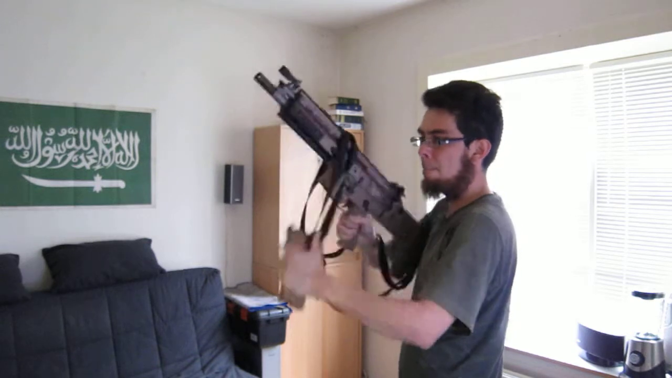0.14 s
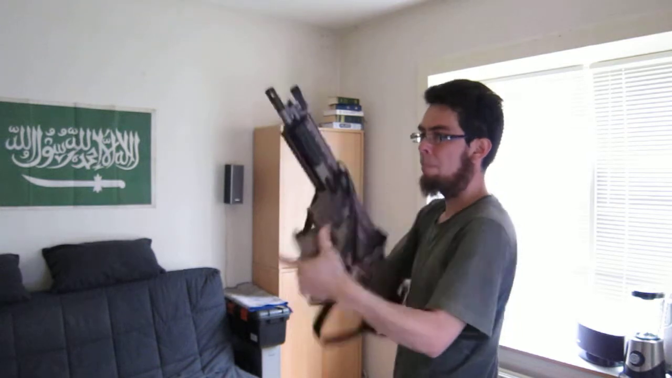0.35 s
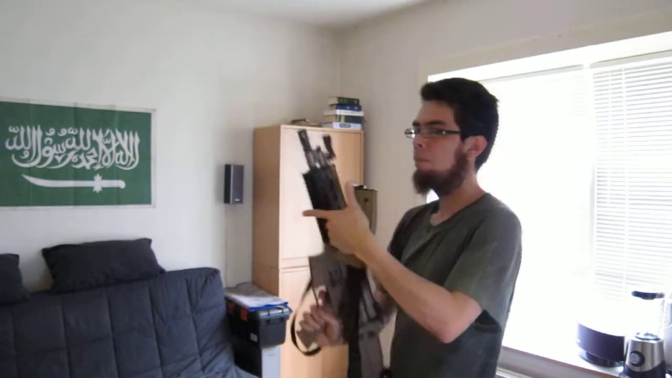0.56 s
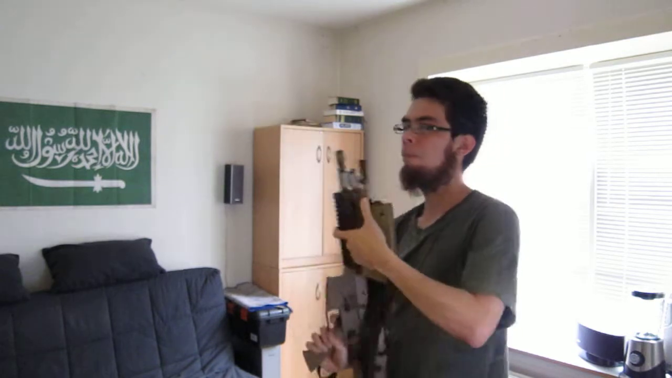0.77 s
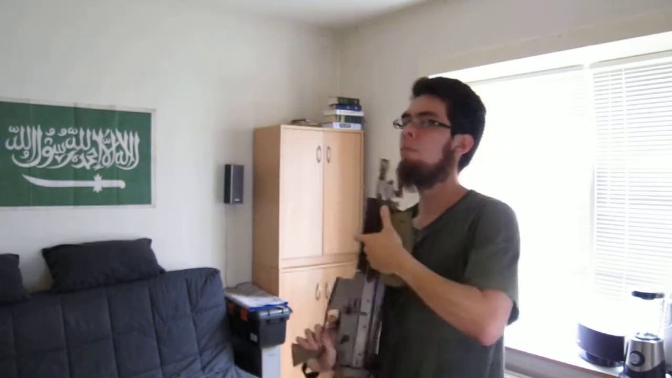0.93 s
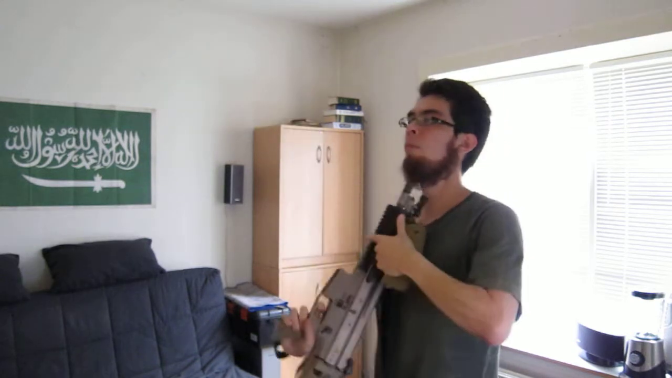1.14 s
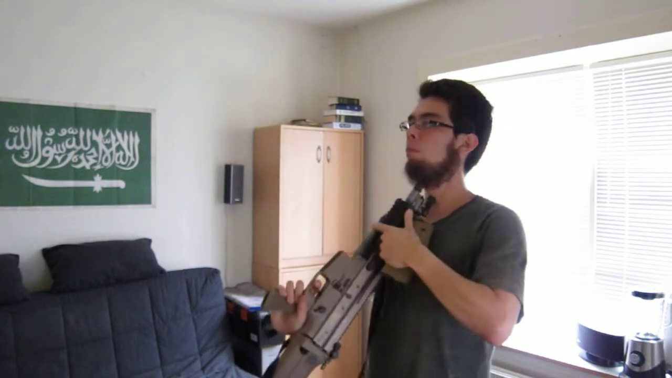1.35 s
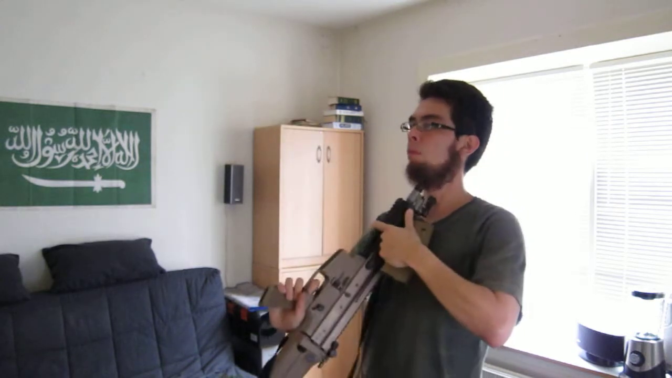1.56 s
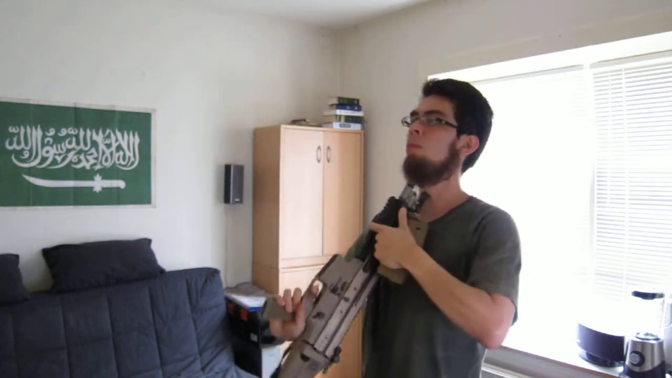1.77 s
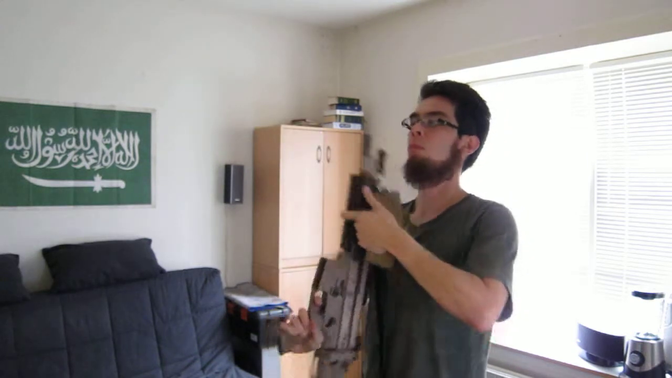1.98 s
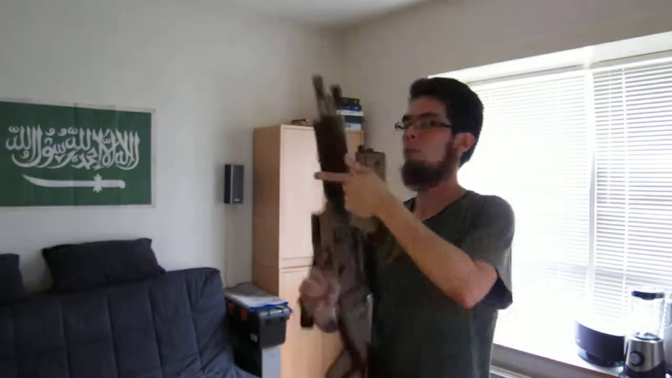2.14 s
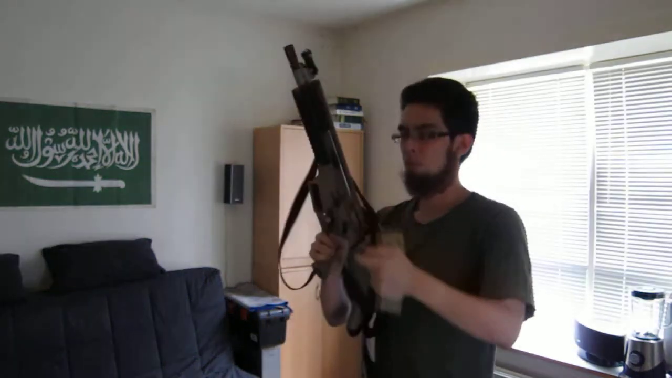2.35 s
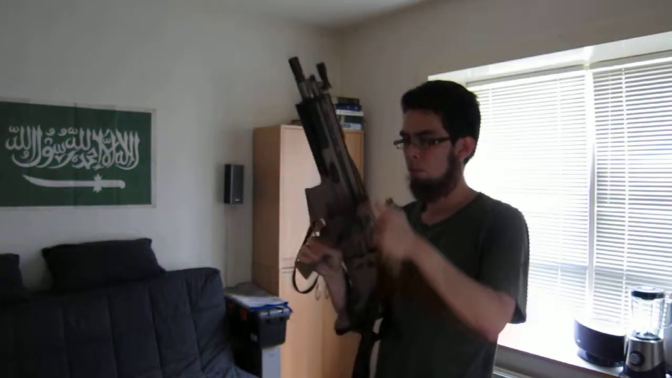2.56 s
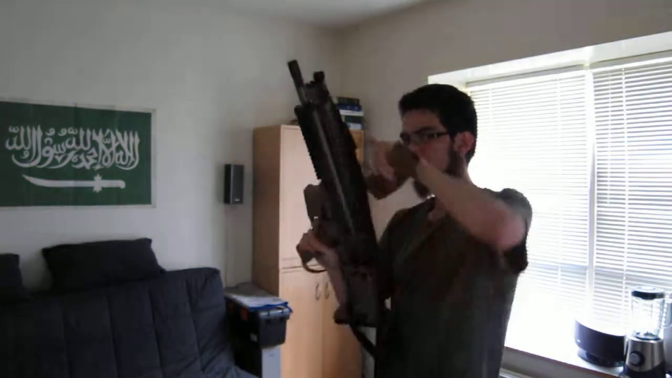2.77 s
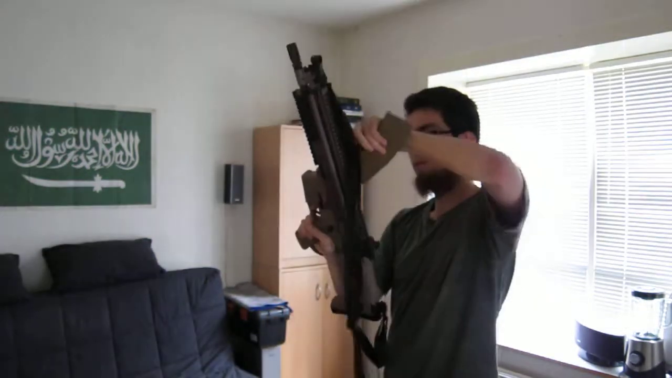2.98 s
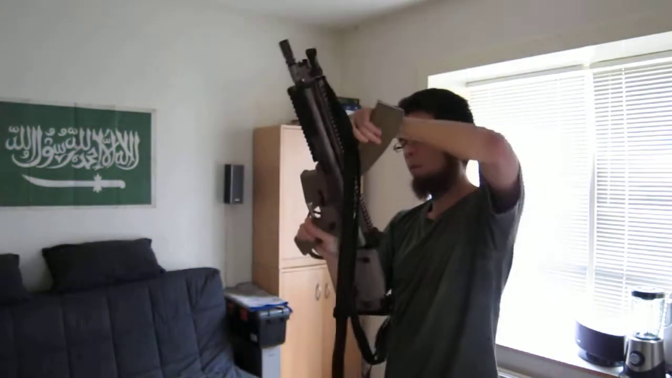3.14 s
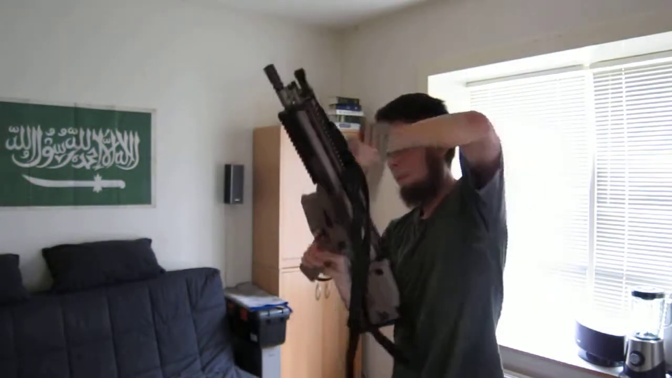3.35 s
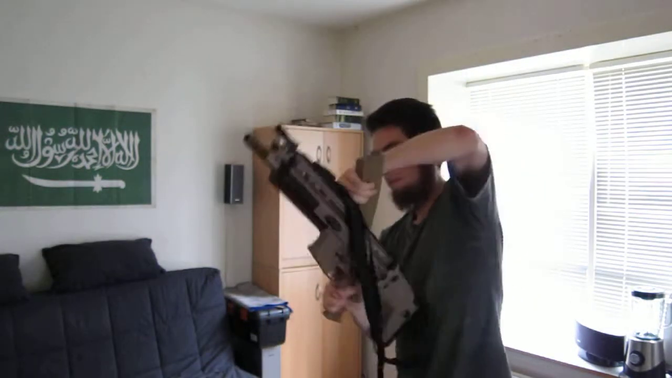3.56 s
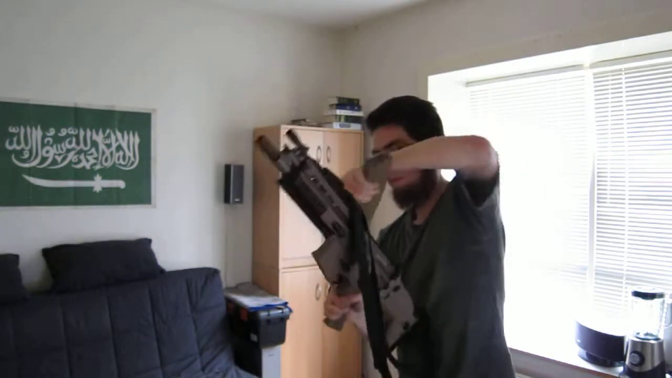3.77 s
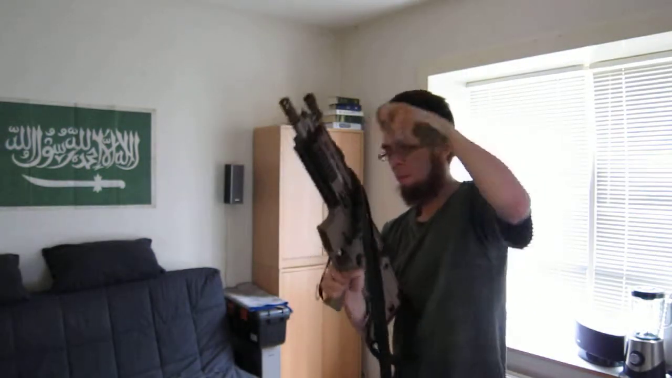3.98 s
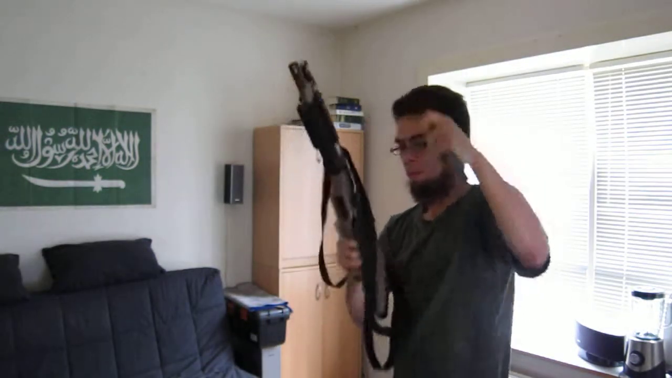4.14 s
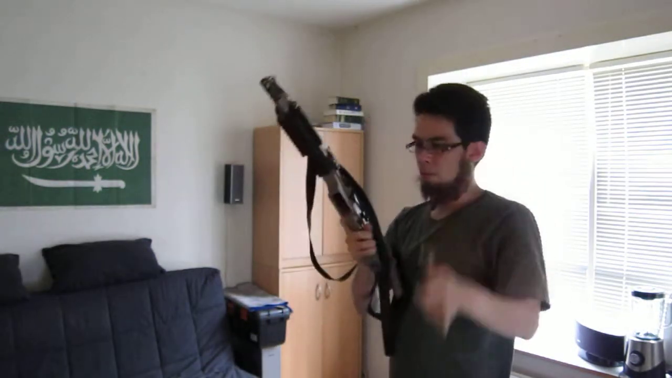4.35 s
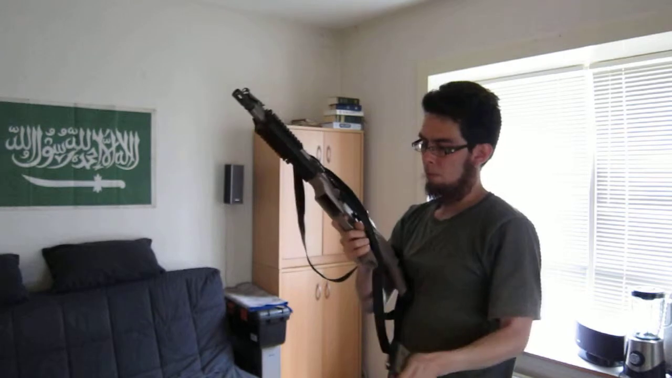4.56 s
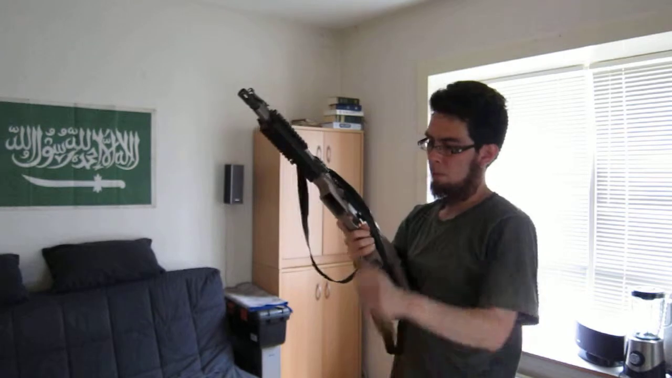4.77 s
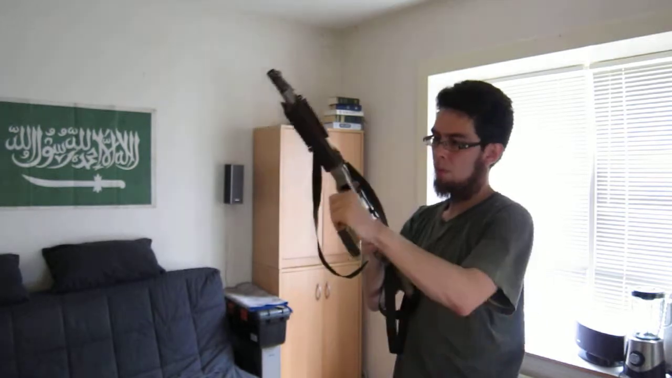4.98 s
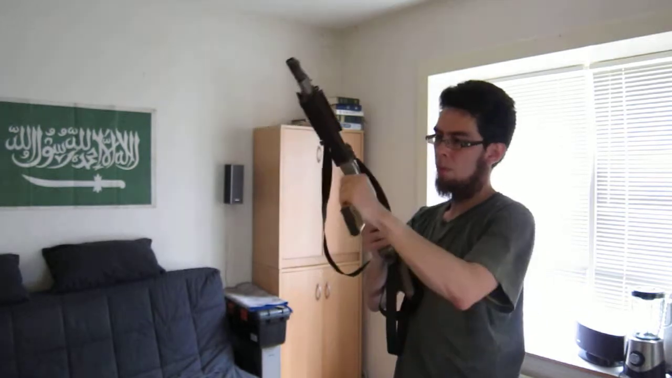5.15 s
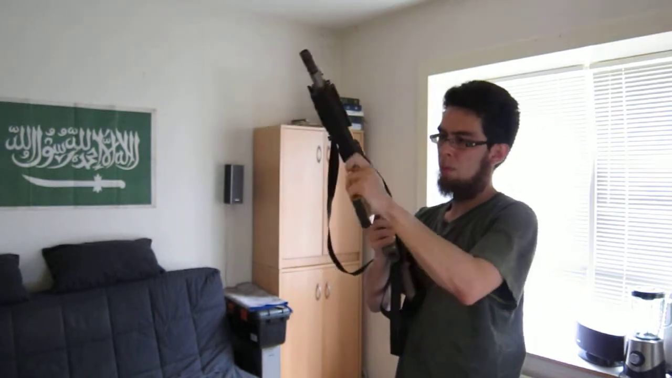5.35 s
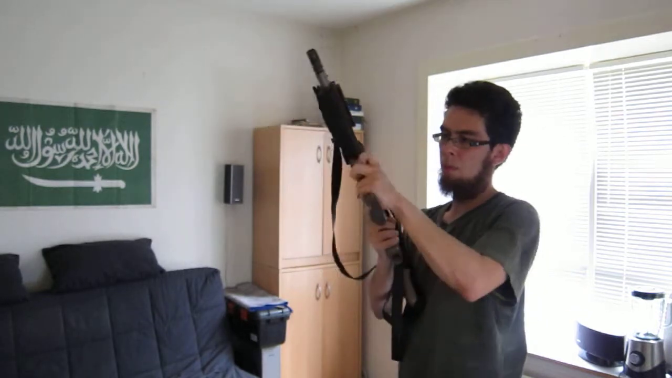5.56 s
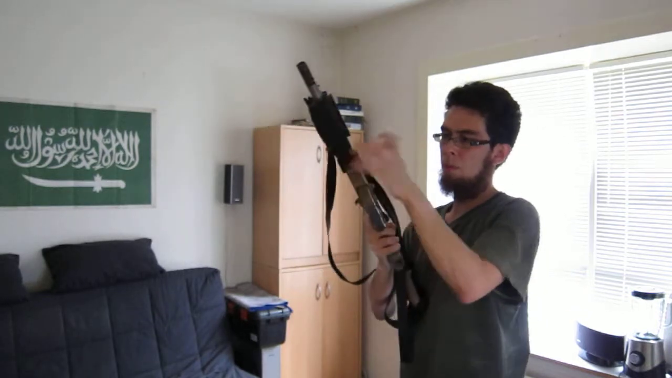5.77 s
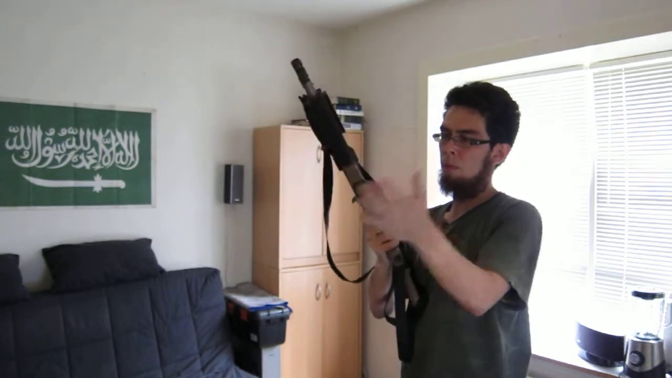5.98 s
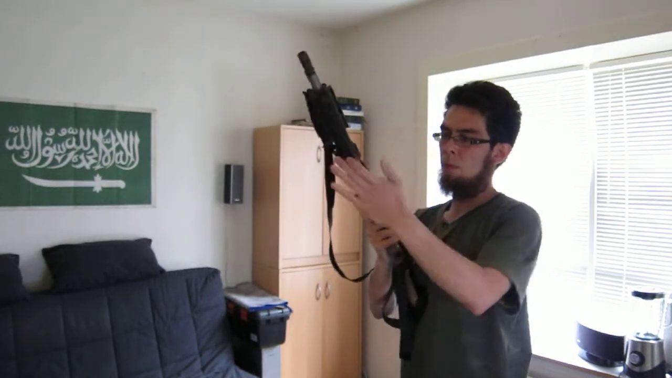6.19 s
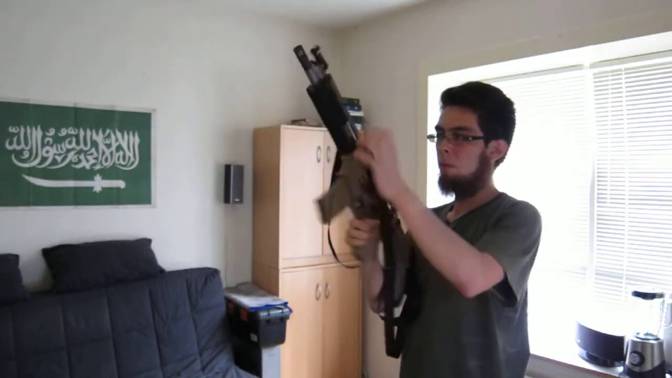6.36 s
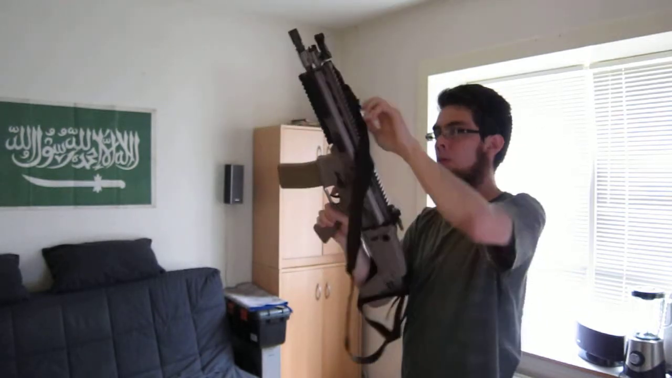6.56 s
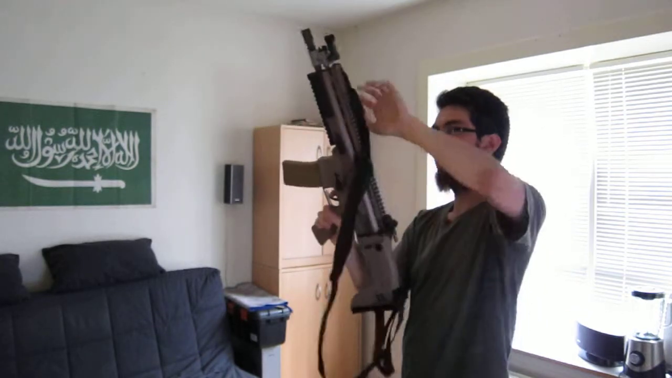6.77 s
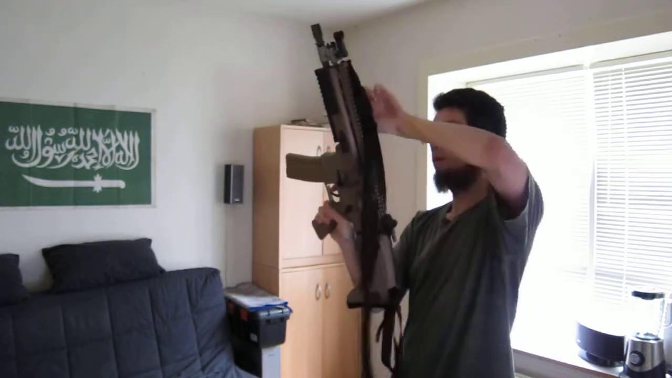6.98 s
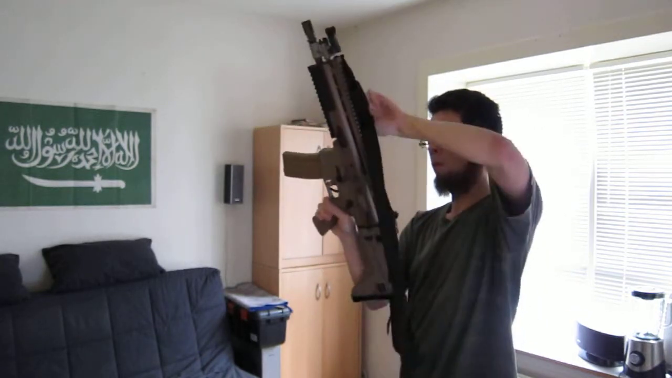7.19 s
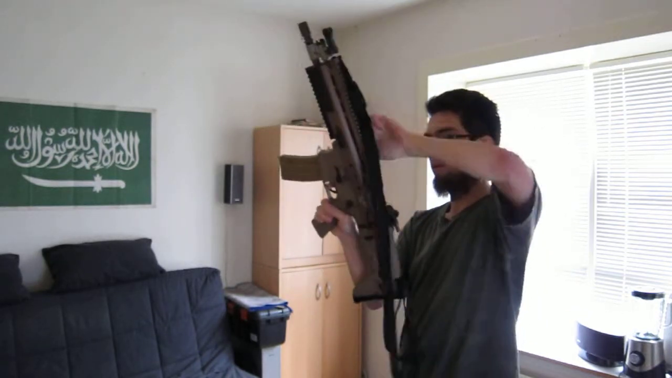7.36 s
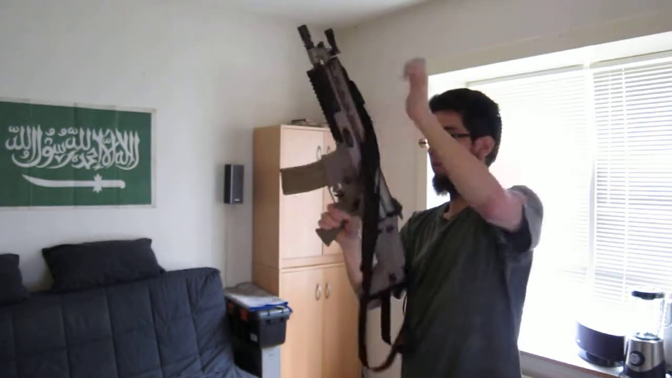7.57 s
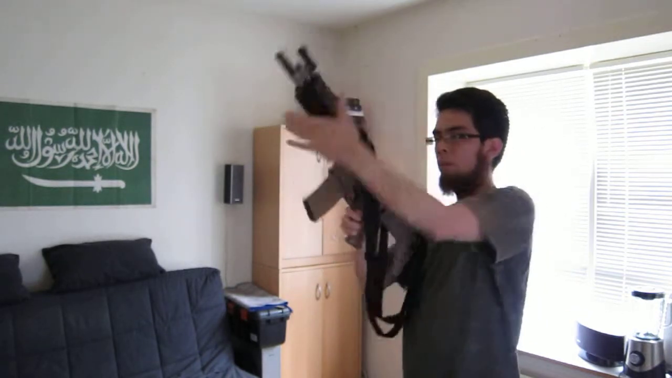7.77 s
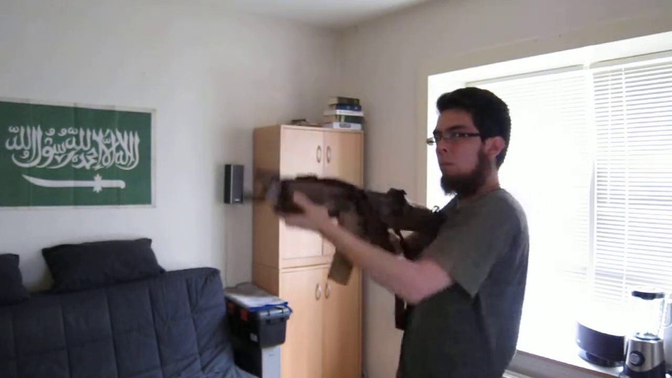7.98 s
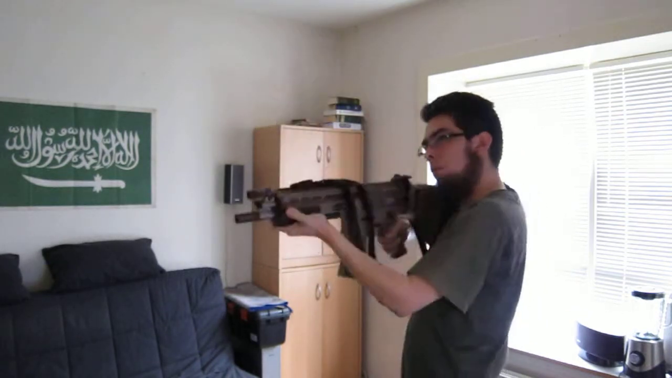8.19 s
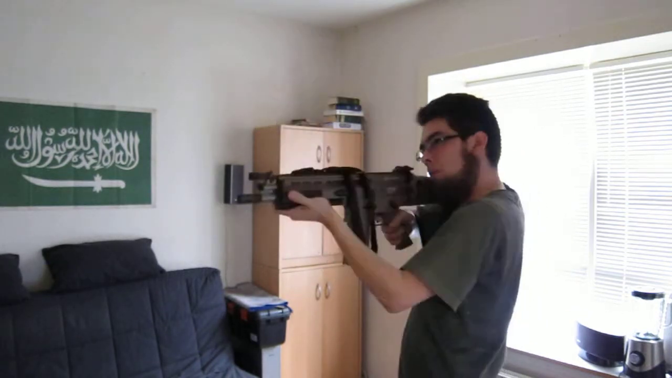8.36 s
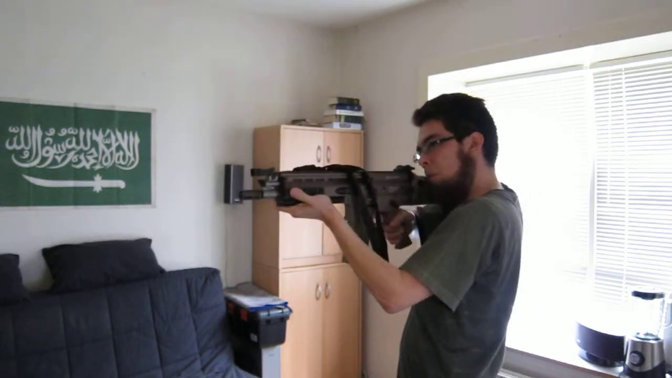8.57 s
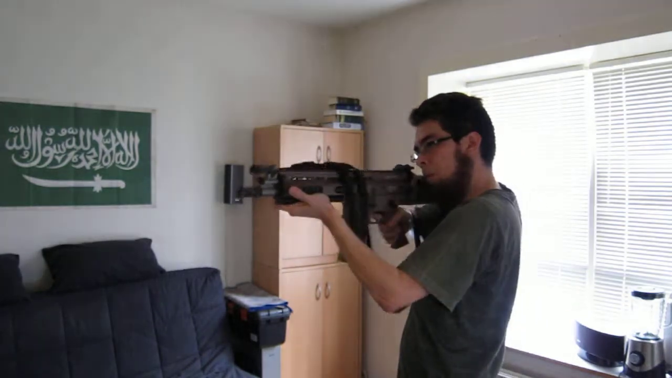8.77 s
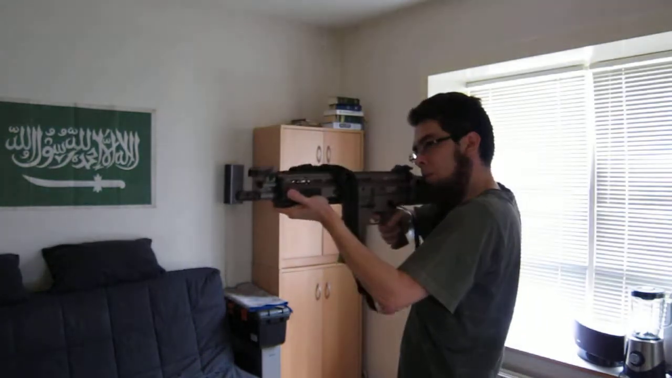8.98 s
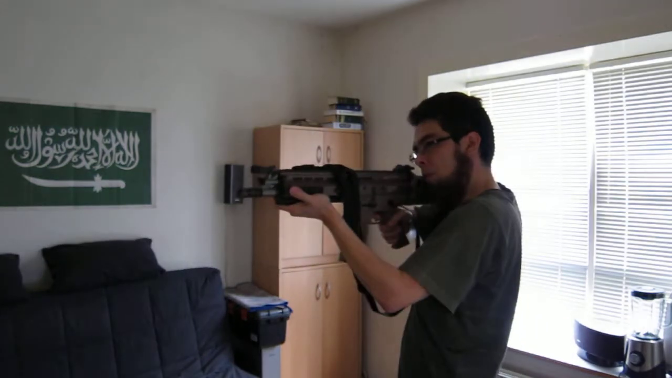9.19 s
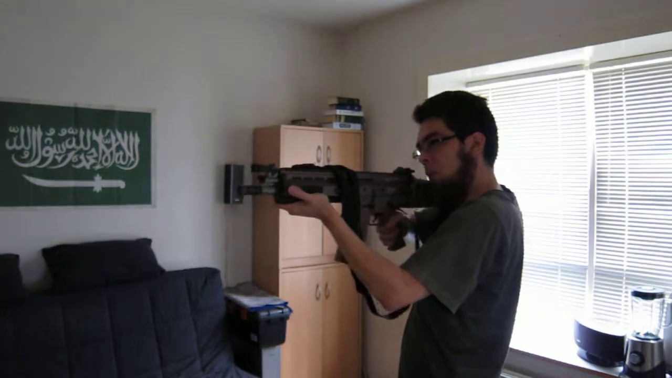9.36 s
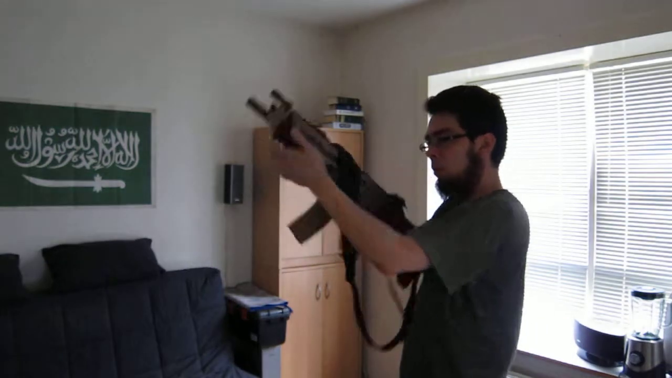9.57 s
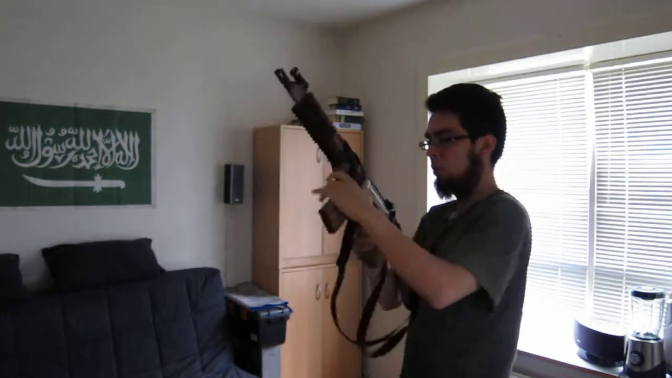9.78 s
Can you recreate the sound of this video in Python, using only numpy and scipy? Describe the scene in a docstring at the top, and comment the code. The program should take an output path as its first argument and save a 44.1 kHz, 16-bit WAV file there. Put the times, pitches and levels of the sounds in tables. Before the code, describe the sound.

Toy gas rifle handled indoors: knocks, palm slaps, latching clicks and bolt pulls, then one rapid burst of seven loud cracks over faint hum.

```python
"""A gas blowback toy rifle in a small room: knocks, palm slaps, catches, sling rustle, the bolt drawn and let go.
Then it fires one burst of seven; each cycle is a bolt slam, a puff of gas and the bolt hitting its rear stop.
Every contact is a short spray of noise coloured by the parts that meet, and ringing tones follow it.
Soft air noise and a faint hum lie under it all.
The recorder's gain control ducks at loud cracks and recovers slowly."""
import sys
import numpy as np
from scipy import signal
from scipy.fft import rfft, irfft, next_fast_len
from scipy.io import wavfile
from scipy.ndimage import uniform_filter1d

SR = 44100
rng = np.random.default_rng(int(sys.argv[2]) if len(sys.argv) > 2 else 0)


def master(y):
    """Save y as 16-bit WAV."""
    cut = np.clip(np.atleast_2d(y).T, -1, 1)
    pcm = np.round(cut * 32767)  # scale
    wavfile.write(sys.argv[1], SR, pcm.astype(np.int16))


N = 433503
TIME = np.arange(N) / SR  # [s]

# Hands and sling rub over the rifle: (start [s], end [s], level [dB], bright edge [dB])
RUBS = [(0, .08, -36, -15.5), (0.184, 0.404, -59.5, -10.5), (0.403, .566, -59.5, -1),
        (.64, .767, -53.5, -16), (2.05, 2.25, -50, -21), (2.321, 2.726, -57.5, -29),
        (2.83, 2.95, -53, -22.5), (4.62, 5.08, -79, -23), (5.419, 5.541, -54.5, -12.5),
        (5.541, 5.66, -30, -20), (5.68, 5.8, -46.5, -20), (6.601, 6.7, -42.5, -24.5),
        (6.922, 7.03, -40, -30), (9.489, 9.71, -31.5, -14), (9.768, 9.87, -29, -20)]
# Hard parts knock together: (time [s], level [dB], resonance of the part [Hz], bright edge [dB])
KNOCKS = [(0.002, 9, 3300, -19), (0.171, -1, 3200, -21), (0.65, 2.5, 2000, -15.5), (0.702, -2, 2920, -28),
          (0.722, 1.5, 1500, -24.5), (0.941, -3.5, 1500, -10), (0.959, 22, 2600, -27),
          (1.191, 0.5, 1340, -23), (1.199, 7.5, 1060, -31.5), (1.36, -13.5, 2987, -16),
          (2.095, -5.5, 1810, -36), (2.59, -8, 2030, -58), (2.889, 3, 2180, -19), (2.954, 10, 3100, -22),
          (3.183, 1, 2640, -21), (3.229, 4.5, 3270, -18), (3.258, 5, 2210, -17.5), (3.801, 10, 2920, -38),
          (4.223, 5, 2700, -33.5), (5.186, 17, 1280, -17), (5.582, 12.5, 1360, -22),
          (5.607, 17.5, 1500, -12), (6.464, 7.5, 3340, -16.5), (6.624, 1, 2000, -27),
          (6.914, -3, 3300, -25), (6.933, 7, 3180, -24), (6.982, 6, 3130, -35.5), (7.052, 4, 2050, -16),
          (7.209, 6, 1940, -23.5), (9.767, 14, 1970, -21)]
# A palm lands on the body: (time [s], level [dB], resonance of the part [Hz], its strength [dB])
SLAPS = [(0.583, -6.5, 1860, 6.5), (4.354, 5, 1300, 5), (5.11, -2, 1657, 14), (6.784, -5, 1510, 4),
         (8.281, 9, 1600, 3.5)]
# A sprung catch snaps: (time [s], level [dB])
CATCHES = [(0.768, 14), (7.88, 24.5)]
# A part is pushed home and latches:
# (time [s], level [dB], resonance of the part [Hz], thud [dB], hollow ring [dB])
LATCHES = [(1.533, 27.5, 3250, -29.5, 0), (6.094, 30, 1670, -12, -5)]
# The bolt is drawn back: (starts to move [s], hits the rear stop [s], level of the stop [dB],
# level of riding over the hammer [dB], hollow ring [dB], final level of the scrape [dB])
BOLT_PULLS = [(3.235, 3.4216, 36, 29.5, -4.5, -24), (7.224, 7.314, 32.5, 20, 0, -14)]
# Other contacts in every pull, ending with the stop:
# (time before the stop [s], level against the stop [dB], chatter time [s])
PULL_CONTACTS = [(.065, -21, .004), (.008, -11, 0.0049), (0.0016, 0, 0.0031)]
# The bolt runs forward and snaps home without a shot: (time [s], level [dB])
BOLT_HOME = [(3.85, 35.5), (7.5, 37), (9.2558, 39.5)]
# Automatic fire: (bolt slams shut [s], gas valve opens [s], level [dB])
SHOTS = [(8.6232, 8.6265, 48), (8.693, 8.707, 45.5), (8.788, 8.793, 49), (8.879, 8.886, 45),
         (8.973, 8.983, 43), (9.065, 9.078, 42.5), (9.164, 9.175, 41.5)]

# Colour shared by every contact and rub: (frequency [Hz], level [dB])
RIFLE_COLOUR = [(40, -20), (130, -8), (250, -5), (400, -4), (570, -4.5), (800, -4.5), (1200, -5),
                (1700, -3.5), (3300, -1.5), (4400, -1), (5500, -2.5), (7000, -2.5), (12500, -3.5),
                (16000, -16)]
# Ringing tones of the receiver, catch and bolt: (frequency [Hz], level [dB], time to fall 60 dB [s])
RECEIVER_TONES = [(577, -57, 0.25), (1250, -58.5, 0.15), (1670, -55, 0.061), (2770, -56, 0.039)]
CATCH_TONES = [(1011, -48, 0.086), (1890, -45, .09), (2260, -59, .08), (3680, -54, 0.17),
               (4420, -50, 0.069), (6126, -46, 0.13), (9470, -59, .16), (10700, -45, .12)]
BOLT_TONES = [(2930, -51, 0.082), (3400, -54, 0.25), (3370, -59, 0.25), (6200, -50.5, 0.21),
              (11300, -57.5, 0.32), (13000, -49, .18)]

# How long the room rings: (frequency [Hz], time to fall 60 dB [s])
ROOM_T60 = [(60, 0.39), (200, 0.33), (530, 0.32), (1390, 0.34), (3680, 0.33), (9700, .24), (16000, 0.25)]
# How loud the room answers: (frequency [Hz], level [dB])
ROOM_DB = [(60, -6.5), (250, 4.5), (1000, 4.5), (3000, 3.5), (6000, 3), (12000, 3)]
# How alike diffuse sound is on the two sides: (frequency [Hz], likeness [1 = same, 0 = unrelated])
LIKENESS = [(60, 0.83), (240, 0.7), (500, .78), (1000, 0.8), (2000, 0.42), (4000, -0.14), (12000, 0.0068)]
# Colour of the air noise: (frequency [Hz], relative level [dB])
AIR = [(25, -23), (50, -5), (80, -9), (125, -5.5), (200, -14.5), (400, -18.5), (620, -18.5), (850, -14),
       (1250, -20.5), (1650, -17), (2200, -20.5), (3000, -19.5), (5000, -27.5), (9000, -35.5),
       (15000, -41.5)]
# Hum tones: (frequency [Hz], early peak level [dB], late peak level [dB])
HUM = [(49.2, -55, -53), (123.4, -56, -62)]
# The hum moves from its early to its late levels between these times: (start [s], end [s])
HUM_SETTLES_S = (3.2, 4.5)

PLACES = 5  # positions from which the rifle's parts sound into the room

# Knocks are brief and thin; the lower the part's resonance, the hollower it sounds
KNOCK_CHATTER_S, KNOCK_THUD_DB = 0.0024, -24.5
HOLLOW_DB, HOLLOW_DB_PER_OCTAVE, SMALL_PART_HZ = -6.5, 8.5, 3000
RATTLE_DB, RATTLE_SPREAD_DB = 37, 1  # level against the rub, and its spread either way
LATCH_SLIDE_S, LATCH_SLIDE_DB = 0.0075, -21  # it scrapes for this long before and after
HAMMER_LEAD_S = 0.0435  # the bolt rides over the hammer this long before the stop
PULL_SWELL_DB, RAIL_EDGE_DB = 14, -20  # the scrape on the rails grows as the spring tightens
# Run home: its length, its scrape against the snap, and how much the scrape grows with speed
RETURN_S, RETURN_SCRAPE_DB, RETURN_SWELL_DB = 0.06, -47, 11
FIRST_RUN_S, FIRST_RUN_DB = 0.0096, -16.5  # the short, loud scrape each side of the first slam
PING_S, PING_HZ, PING_DB, PING_T60_S = 9.482, 11300, -35, 0.22


def from_db(db):
    """Turn decibels into a multiplier."""
    return 10 ** (np.asarray(db) / 20)


def at_hz(points, hz):
    """Read a table on a log-frequency axis."""
    f, value = np.transpose(points)
    return np.interp(np.log(np.maximum(hz, 1)), np.log(f), value)


def butter(x, hz, kind, order=2):
    """Filter with a smooth Butterworth slope."""
    return signal.sosfilt(signal.butter(order, hz, kind, fs=SR, output="sos"), x)


def add(out, s, sound):
    """Mix a sound in at time s."""
    i = max(round(s * SR), 0)
    out[i:i + len(sound)] += sound[:max(N - i, 0)]


def causal(gain):
    """The minimum-phase response with these gains: nothing sounds before its cause."""
    cepstrum = irfft(np.log(gain + 1e-9))
    half = len(cepstrum) // 2
    cepstrum[1:half] *= 2
    cepstrum[half + 1:] = 0
    return np.exp(rfft(cepstrum))


def stereo_noise(size):
    """Spectra of diffuse noise: the sides are much alike in lows and mids, unlike in the treble."""
    hz = np.fft.rfftfreq(size, 1 / SR)
    alike = np.clip(at_hz(LIKENESS, hz), -0.99, 0.99)
    mid, side = rfft(rng.standard_normal((2, size)))
    opposite = [[1], [-1]]
    return hz, np.sqrt((1 + alike) / 2) * mid + np.sqrt((1 - alike) / 2) * side * opposite


def background(air_db=-55, waver_db=2.8):
    """Soft air noise and a wavering appliance hum: its upper tone settles lower, its lower one rises."""
    hz, noise = stereo_noise(2 * next_fast_len(N // 2 + 1))
    air = irfft(noise * from_db(at_hz(AIR, hz)))[:, :N]
    out = from_db(air_db) * air / air.std()
    for line_hz, early_db, late_db in HUM:
        waver = np.interp(TIME, np.linspace(0, TIME[-1], 160), rng.standard_normal(160))
        db = np.interp(TIME, HUM_SETTLES_S, [early_db, late_db]) + waver_db * waver
        out = out + from_db(db) * np.sin(2 * np.pi * line_hz * TIME)
    return out


def touch_db(thud_db, hollow_db, edge_db, hz):
    """Palms give a thud, hollow plastic a knock, hard corners a bright edge."""
    return at_hz([(260, thud_db), (1000, hollow_db), (3000, 0), (11000, edge_db)], hz)


def contact(thud_db, hollow_db, edge_db, chatter_s, part_hz, part_db=2.5, part_width=0.11, size=4096):
    """Loose parts meet in a dying spray of micro-impacts, coloured by the resonance of the part touched."""
    t, hz = np.arange(size) / SR, np.fft.rfftfreq(size, 1 / SR)
    density = (1 - np.exp(-t / 0.002)) * np.exp(-t / chatter_s)
    uneven = from_db(2.5 * rng.standard_normal(size))
    spray = rfft(rng.standard_normal(size) * uneven * density)
    # even out the spray's own spectrum, so that the colour below decides it
    spray *= causal(uniform_filter1d(np.abs(spray) ** 2, size=36) ** -0.5)
    resonance_db = part_db / (1 + ((hz / part_hz - 1) / part_width) ** 2)
    colour_db = touch_db(thud_db, hollow_db, edge_db, hz) + at_hz(RIFLE_COLOUR, hz) + resonance_db - 2.0
    return irfft(spray * causal(from_db(colour_db))) * np.linspace(1, 0, size)


def slide(length_s, db, edge_db, swell_db=0, grain_db=4):
    """Rubbing is a grainy hiss that swells and fades with the movement."""
    size = max(int(length_s * SR), 64)
    steps = np.arange(0, size, 100)
    grip = np.interp(np.arange(size), steps, rng.standard_normal(len(steps)))
    loudness = from_db(grain_db * grip + np.linspace(-swell_db, 0, size))
    grains = rng.standard_normal(size) * loudness * signal.windows.tukey(size, 0.5)
    touch = contact(thud_db=-23.5, hollow_db=-2.5, edge_db=edge_db, chatter_s=0.00019, part_hz=2600)
    return from_db(db + 4) * signal.fftconvolve(grains, touch)


def rubs(out):
    """Hands and sling rub over the rifle."""
    for start, end, db, edge_db in RUBS:
        add(out, start, slide(end - start, db, edge_db))


def blow(s, db, thud_db, hollow_db, edge_db, chatter_s, part_hz, part_db=4):
    """One blow: when, how hard, its colour, how long it chatters, which part and how much that resonates."""
    return s, db, thud_db, hollow_db, edge_db, chatter_s, part_hz, part_db


def blows(rows, tones, spread_db, size=16384):
    """Each blow is a contact plus ringing tones; the rifle moves, so they come from several places in turn."""
    out, t = np.zeros((PLACES, N)), np.arange(size) / SR
    hz, tone_db, t60 = np.transpose(tones)
    fades = from_db(-60 * t / t60[:, None])
    for k, (s, db, thud_db, hollow_db, edge_db, chatter_s, part_hz, part_db) in enumerate(rows):
        place = out[k % PLACES]
        add(place, s, from_db(db) * contact(thud_db, hollow_db, edge_db, chatter_s, part_hz, part_db))
        # the grip shifts each tone's strength and pitch a little
        luck, detune = rng.standard_normal((2, len(hz)))
        strength = from_db(db + tone_db + touch_db(thud_db, hollow_db, edge_db, hz) + spread_db * luck)
        shifted_hz = hz * (1 + 0.0047 * detune)
        rings = fades * np.sin(2 * np.pi * shifted_hz[:, None] * t)
        add(place, s, (strength * rng.choice([-1, 1], len(hz))) @ rings)
    return out


def knock(s, db, part_hz, edge_db):
    """The blow of one hard part on another."""
    hollow_db = HOLLOW_DB + HOLLOW_DB_PER_OCTAVE * np.log2(SMALL_PART_HZ / part_hz)
    return blow(s, db, KNOCK_THUD_DB, hollow_db, edge_db, KNOCK_CHATTER_S, part_hz, part_db=5.0)


def rattles(low_hz=1800, high_hz=3700, count=2):
    """Each rub shakes a couple of loose fittings, which tick at random moments."""
    rows = []
    for start, end, db, edge_db in RUBS:
        for when, pitch, luck in rng.random((count, 3)):
            s = start + when * (end - start)
            level_db = db + RATTLE_DB + RATTLE_SPREAD_DB * (2 * luck - 1)
            rows.append(knock(s, level_db, low_hz * (high_hz / low_hz) ** pitch, edge_db))
    return rows


def palm_slaps():
    """A soft palm on the body gives much thud and little bright edge."""
    return [blow(s, db, thud_db=-1.5, hollow_db=3, edge_db=-24.5, chatter_s=0.0019, part_hz=hz, part_db=part_db)
            for s, db, hz, part_db in SLAPS]


def catch_snaps():
    """A sprung catch snaps with hardly any thud."""
    return [blow(s, db, thud_db=-33, hollow_db=-3.0, edge_db=-12.5, chatter_s=0.0036, part_hz=3510, part_db=4.5)
            for s, db in CATCHES]


def latches():
    """A part stops with a bright click as it latches."""
    return [blow(s, db, thud_db, hollow_db, edge_db=-9.5, chatter_s=0.0022, part_hz=hz)
            for s, db, hz, thud_db, hollow_db in LATCHES]


def latch_scrapes(out):
    """The latching part scrapes into place."""
    for s, *_ in LATCHES:
        add(out, s - LATCH_SLIDE_S, slide(2 * LATCH_SLIDE_S, LATCH_SLIDE_DB, edge_db=-18.5))


def pulls():
    """Drawn back by hand, the bolt jolts loose, cocks the hammer and hits its rear stop."""
    rows = []
    for _, stop, db, hammer_db, hollow_db, _ in BOLT_PULLS:
        rows.append(blow(stop - HAMMER_LEAD_S, hammer_db, thud_db=-26.5, hollow_db=hollow_db,
                         edge_db=-12, chatter_s=0.003, part_hz=2900))
        for lead_s, step_db, chatter_s in PULL_CONTACTS:
            rows.append(blow(stop - lead_s, db + step_db, thud_db=-22, hollow_db=hollow_db,
                             edge_db=-13.5, chatter_s=chatter_s, part_hz=1910))
    return rows


def rail_scrapes(out):
    """The bolt scrapes along its rails, both drawn back and running forward."""
    for start, stop, *_, db in BOLT_PULLS:
        add(out, start, slide(stop - start, db, RAIL_EDGE_DB, PULL_SWELL_DB))
    for s, db in BOLT_HOME:
        add(out, s - RETURN_S, slide(RETURN_S, db + RETURN_SCRAPE_DB, RAIL_EDGE_DB, RETURN_SWELL_DB))
    # the first shot of the burst also starts with the bolt running forward
    add(out, SHOTS[0][0] - FIRST_RUN_S, slide(2 * FIRST_RUN_S, FIRST_RUN_DB, RAIL_EDGE_DB))


def handling():
    """Knocks, slaps, latches and bolt pulls ring the receiver; the catches have a ring of their own."""
    rows = [knock(*row) for row in KNOCKS] + palm_slaps() + latches() + pulls() + rattles()
    return blows(rows, RECEIVER_TONES, spread_db=3) + blows(catch_snaps(), CATCH_TONES, spread_db=2)


def action(recoil_s=0.033, slam_db=-2, gas_db=-2, stop_db=-3):
    """Per shot the bolt slams shut, gas jets out and the bolt flies back to its stop; it also snaps home unfired."""
    rows = []
    for shut, valve, db in SHOTS:
        rows.append(blow(shut, db + slam_db, thud_db=-13, hollow_db=-5,
                         edge_db=-10, chatter_s=0.0037, part_hz=3570))
        # the jet is a longer, fuller spray
        rows.append(blow(valve + 0.003, db + gas_db, thud_db=-4, hollow_db=1,
                         edge_db=-11, chatter_s=0.02, part_hz=3100))
        rows.append(blow(valve + recoil_s, db + stop_db, thud_db=-6, hollow_db=-1.5,
                         edge_db=-18.5, chatter_s=0.0057, part_hz=2350))
    for s, db in BOLT_HOME:
        rows.append(blow(s, db, thud_db=-24, hollow_db=-7.5, edge_db=-12.5, chatter_s=0.0021, part_hz=3370))
    return blows(rows, BOLT_TONES, spread_db=2.5)


def puffs(width_s=0.0024, puff_db=-27):
    """Gas leaves the muzzle as one rounded pressure pulse that rises faster than it falls."""
    out, phase = np.zeros(N), np.minimum(np.arange(1024) / SR / width_s, 1)
    pulse = -np.sin(np.pi * phase ** (2 / np.e)) ** 2
    for _, valve, db in SHOTS:
        add(out, valve, from_db(db + puff_db) * pulse)
    return out


def ping():
    """A small spring pings once after the burst: one thin, quickly dying tone."""
    t = np.maximum(TIME - PING_S, 0)
    return from_db(PING_DB - 60 * t / PING_T60_S) * np.sin(2 * np.pi * PING_HZ * t)


def room(places, build_s=0.006, wall_s=0.015, wall_db=4, near=0.98, size=24576):
    """Each place has its own path: direct sound, scatter from the shooter, then a tail that dies by band."""
    t, hz = np.arange(size) / SR, np.fft.rfftfreq(size, 1 / SR)
    # the tail builds up, with a brief bump for a wall
    swell = (1 - np.exp(-(t / build_s) ** 2)) * from_db(wall_db * np.exp(-((t - wall_s) / 0.0021) ** 2))
    scatter = near * np.exp(-t / 0.0039)
    centres = np.geomspace(200, 16000, 7)
    fades = (swell + scatter) * from_db(-60 * t / at_hz(ROOM_T60, centres)[:, None])
    fades /= np.linalg.norm(fades, axis=1, keepdims=True)
    # overlapping frequency bands, each with its own fade
    shares = np.array([at_hz(np.c_[centres, share], hz) for share in np.eye(len(centres))])
    bands = shares * from_db(at_hz(ROOM_DB, hz))
    out = 0
    for k, x in enumerate(places):
        _, noise = stereo_noise(size)
        path = np.sum(irfft(noise[:, None] * bands) * fades, axis=1)
        # from two off-centre places the direct sound reaches one microphone a sample late
        path[0, int(k == 1)] += 1
        path[1, int(k == 2)] += 1
        out = out + signal.oaconvolve(x[None], path, axes=1)[:, :N]
    return out


def scene(puff_room_db=-12, puff_direct_db=-2, puff_pan_db=4.0):
    """The rifle sounds into the room, over air noise and hum."""
    places = handling() + action()
    scrapes = np.zeros(N)
    rubs(scrapes)
    latch_scrapes(scrapes)
    rail_scrapes(scrapes)
    gas = puffs()
    places[-1] += scrapes + ping() + from_db(puff_room_db) * gas
    # part of each puff blows straight onto the microphones, more on the right
    direct_gas = gas * from_db(puff_direct_db + puff_pan_db * np.array([[-1], [1]]))
    return room(places) + direct_gas + background()


def gain_control(x, limit_db=-12.0, release_db_per_s=10, attack_s=0.0017):
    """Loud sound pulls the gain down within milliseconds; it then creeps back at a steady rate."""
    power = uniform_filter1d(np.mean(x ** 2, axis=0), size=130)
    level_db = 10 * np.log10(np.maximum(power, 1e-12))
    # a running maximum against a rising ramp lets the cut shrink steadily after each peak
    ramp = release_db_per_s * TIME
    cut_db = np.maximum.accumulate(np.maximum(level_db - limit_db, 0) + ramp) - ramp
    r = np.exp(-1 / (attack_s * SR))
    return x * from_db(-signal.lfilter([1 - r], [1, -r], cut_db))


def record(dry, overload=3.5, low_cut_hz=25, notch_hz=8200, notch_width_hz=850, silent_above_hz=16600):
    """The microphone overloads and sheds deep bass; then gain control, a notch, clipping and the top cut."""
    overloaded = overload * np.tanh(dry / overload)
    x = gain_control(butter(overloaded, low_cut_hz, "high", order=1))
    b, a = signal.iirnotch(notch_hz, notch_hz / notch_width_hz, fs=SR)
    # the notch is applied twice
    x = signal.lfilter(b, a, signal.lfilter(b, a, x))
    x = np.clip(x, -1, 1)
    # 60 dB down from silent_above_hz upwards
    return signal.sosfilt(signal.cheby2(16, 60, silent_above_hz, fs=SR, output="sos"), x)


dry = scene()
out = record(dry)
master(out)
```